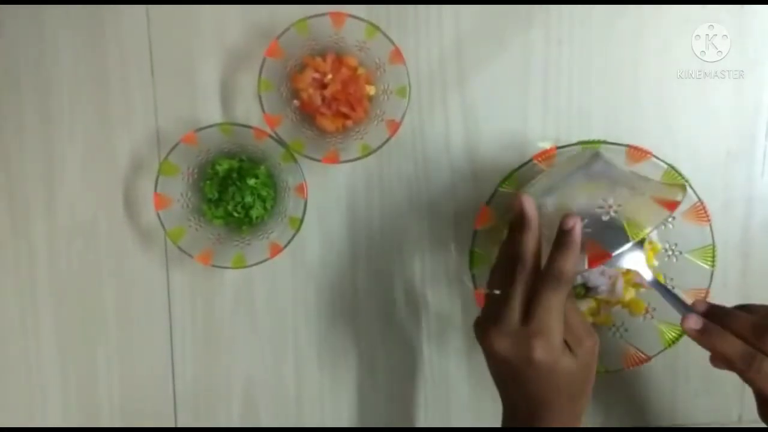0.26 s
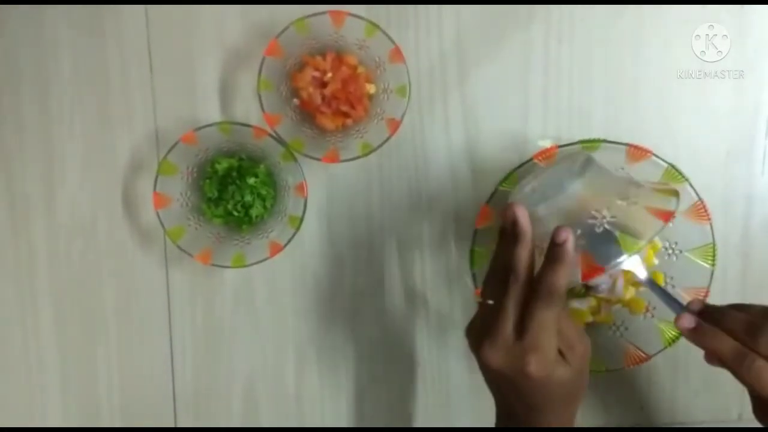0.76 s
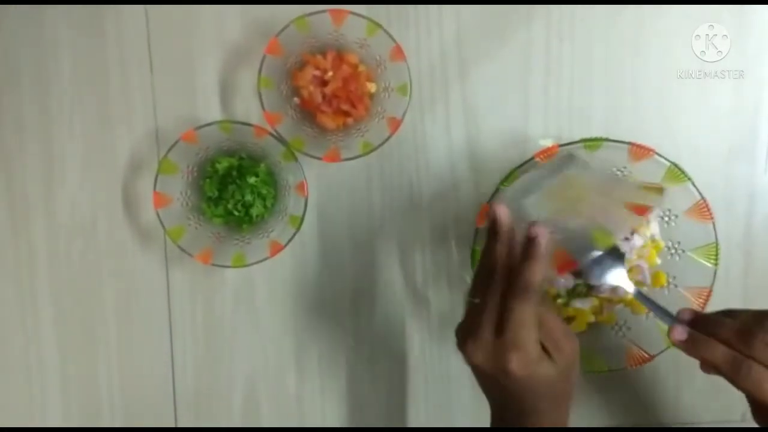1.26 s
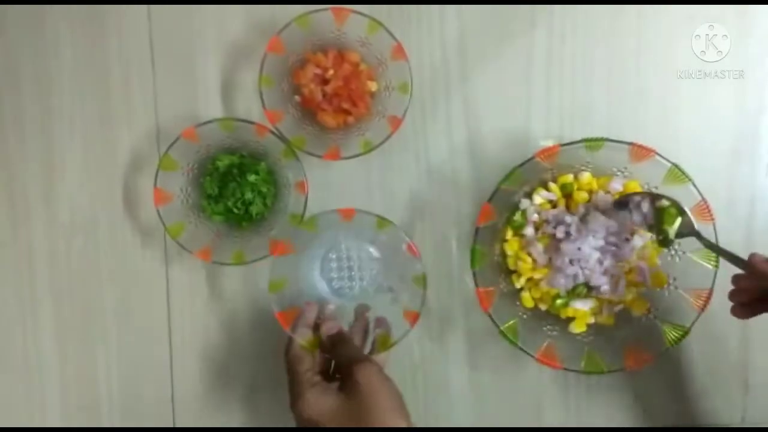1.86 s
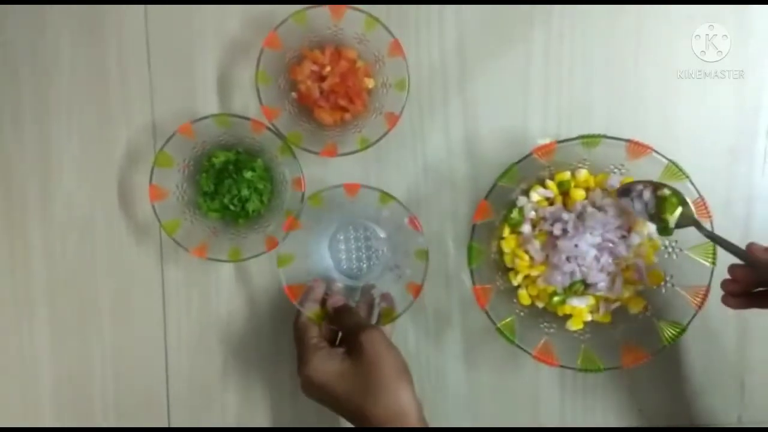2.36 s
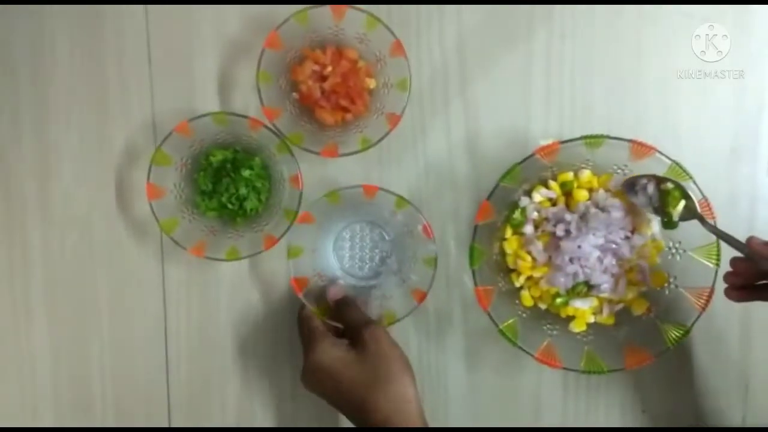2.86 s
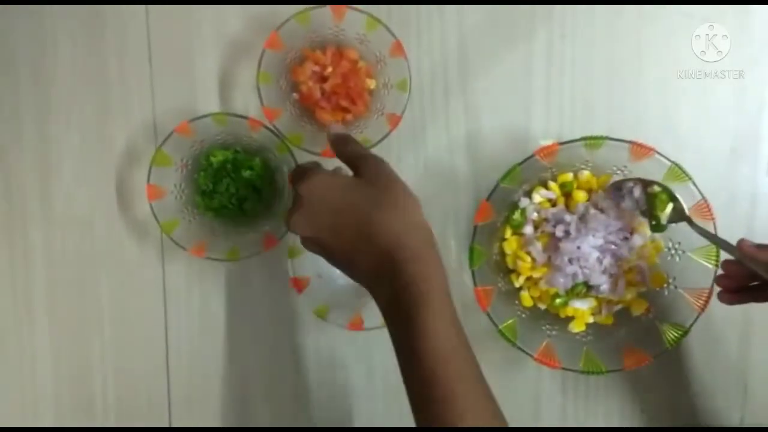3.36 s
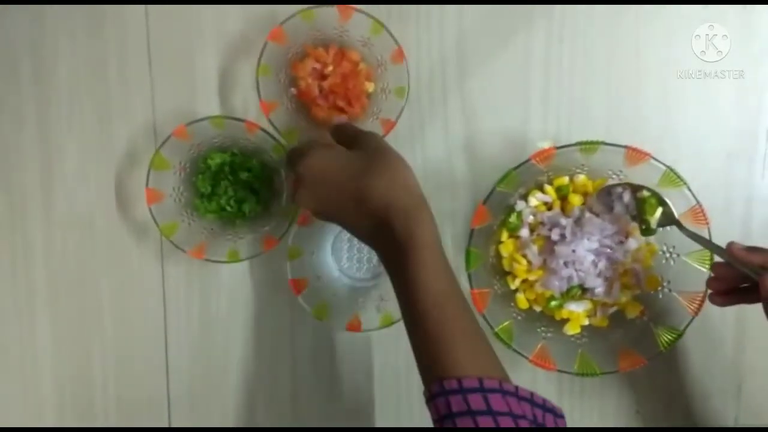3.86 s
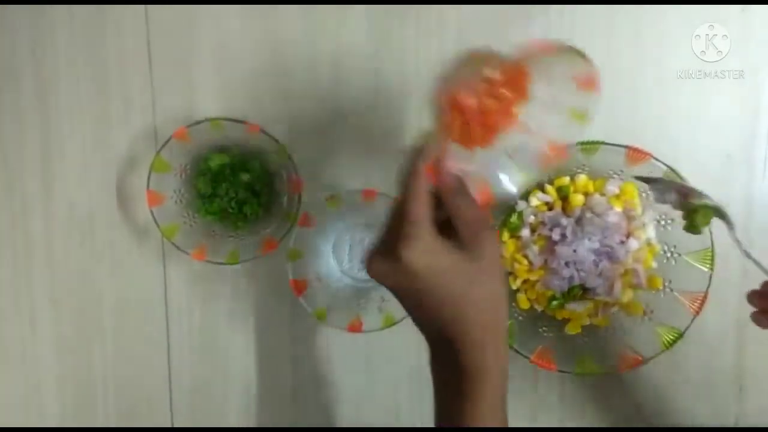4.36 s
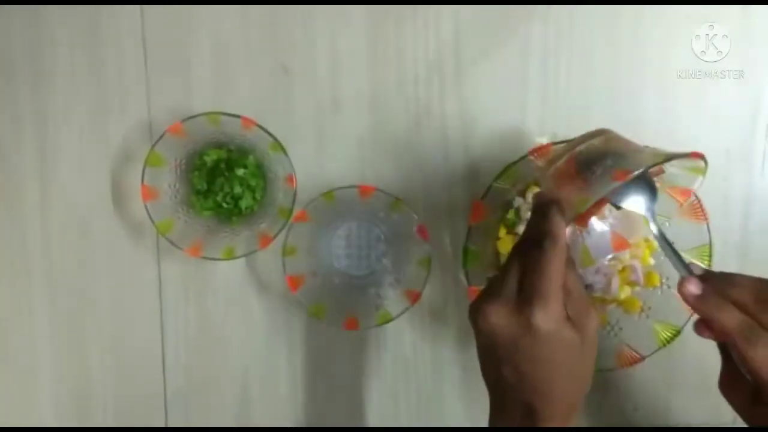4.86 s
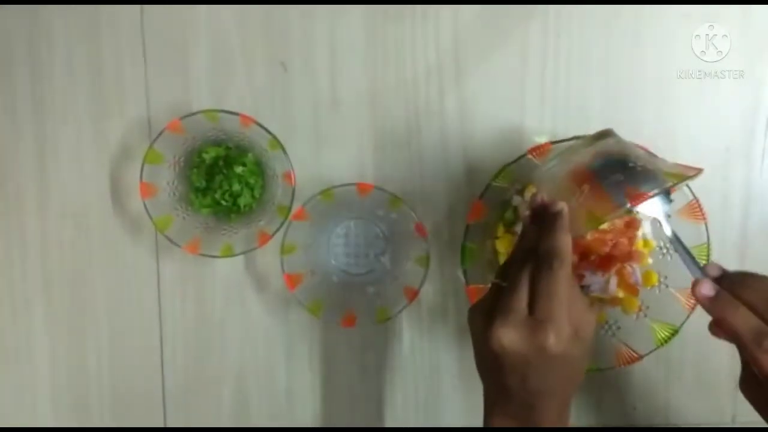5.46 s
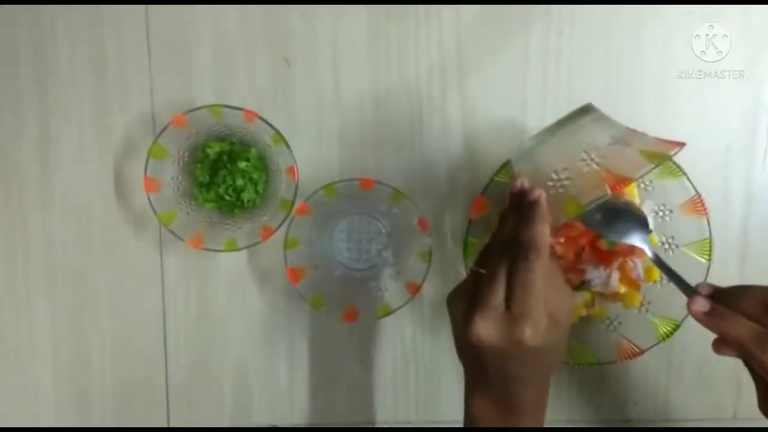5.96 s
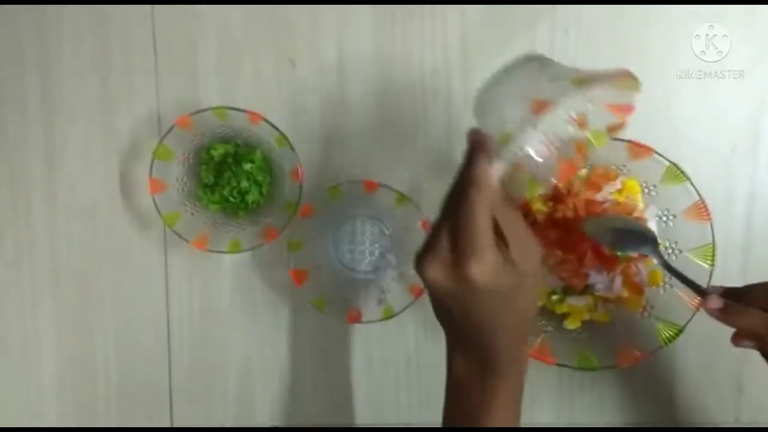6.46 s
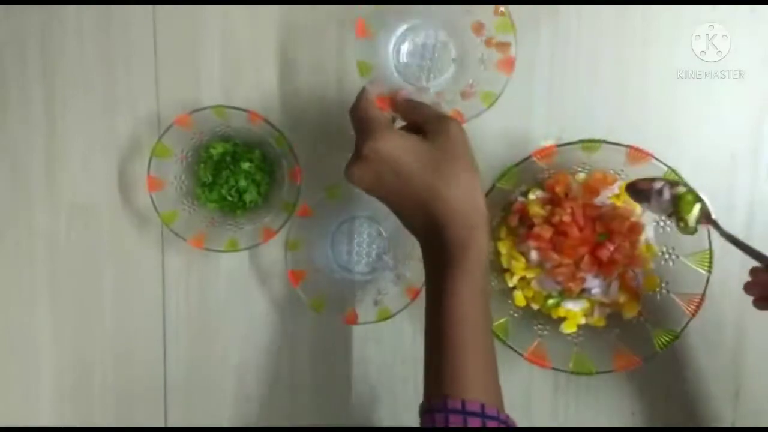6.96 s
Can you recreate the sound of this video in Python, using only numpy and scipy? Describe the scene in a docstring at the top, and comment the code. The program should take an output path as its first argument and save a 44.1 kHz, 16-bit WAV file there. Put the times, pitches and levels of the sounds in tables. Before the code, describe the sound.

In a small, lightly echoing kitchen, a metal spoon scrapes a hand-held glass bowl with irregular sharp clinks, damped by fingers. The empty bowl is set on a wooden table with a hard thud, click and brief rattle, then softly nudged. A second bowl is scraped with a denser run of clinks and tiny ticks. Low room hum and faint hiss persist; close stereo microphone above the table.

```python
"""In a kitchen, a steel spoon scrapes chopped vegetables out of two small hand-held glass bowls. Each clink is
a skidding crack over dying rim and spoon modes; an empty bowl set down on the wooden table and nudged gives
thuds, clicks and rattles; soft low bumps come through the table. The room hums softly, as shaped random spectra
with drifting patches. The two channels carry one sound, one of them inverted and a little late."""
import sys
import numpy as np
from scipy import signal
from scipy.fft import rfft, irfft, next_fast_len
from scipy.io import wavfile
from scipy.ndimage import uniform_filter1d

SR = 44100
rng = np.random.default_rng(int(sys.argv[2]) if len(sys.argv) > 2 else 0)


def log_audio(samples):
    """Write samples as a 16-bit WAV file to the path given in sys.argv[1]."""
    # one column per channel
    frames = np.atleast_2d(samples).T
    # limit to full scale, then quantise
    limited = np.clip(frames, -1, 1)
    pcm = np.round(limited * 32767).astype(np.int16)
    wavfile.write(sys.argv[1], SR, pcm)


N = 318402  # samples


def amp(db):
    """Amplitude factor of a level in dB."""
    return 10 ** (np.asarray(db) / 20)


def evened(x):
    """The signal at an RMS of 1."""
    return x / np.sqrt(np.mean(x ** 2) + 1e-20)


def read(points, hz):
    """Reads a curve of (Hz, value) points, straight over log frequency."""
    point_hz, value = np.transpose(points)
    return np.interp(np.log(hz + 1), np.log(point_hz + 1), value)


def add(mix, start_s, sound):
    """Lays a sound into the mix, cut off at the end."""
    part = mix[..., round(start_s * SR):][..., :sound.shape[-1]]
    part += sound[..., :part.shape[-1]]


def ring(modes, db=0, pitch=1, lasting=1):
    """A struck solid: the sum of its modes, each a dying sine."""
    hz, level_db, t60_s = np.transpose(modes)[:, :, None]
    t = np.arange(SR // 3) / SR
    envelope = amp(level_db + db - 60 * t / abs(t60_s * lasting))
    return (envelope * np.sin(2 * np.pi * hz * pitch * t)).sum(0)


def swing_in(body, rise_s):
    """The modes take a moment to swing."""
    return body * (1 - np.exp(-np.arange(len(body)) / SR / rise_s))


def crack(colour):
    """Minimum-phase impulse: the given colour, starting as promptly as a causal sound can."""
    log_gain = np.log(amp(read(colour, abs(np.fft.fftfreq(1024, 1 / SR)))))
    phase = -signal.hilbert(log_gain).imag
    return np.fft.ifft(np.exp(log_gain + 1j * phase)).real[:512]


def kitchen(x):
    """Room echo: sparse taps of random sign, each band dying at its own speed; other taps per channel."""
    # kitchen decay: hz, t60_s
    decay = [(300, 0.1), (1500, 0.37), (3000, 0.39), (6000, 0.38), (12000, 0.23)]
    taps = np.zeros((2, SR // 2))
    at = np.arange(300, SR // 2 - 20, 20)
    at = at + rng.integers(0, 20, (2, len(at)))
    np.put_along_axis(taps, at, rng.choice([-1., 1.], at.shape), 1)
    hz, t, spectra = signal.stft(taps, SR, nperseg=256)
    dying = amp(-60 * t / abs(read(decay, hz))[:, None])
    tail = signal.istft(spectra * dying, SR, nperseg=256)[1]
    return signal.fftconvolve(x[None], tail / np.linalg.norm(tail[0]), axes=1)


def place(mix, start_s, blow, room_db):
    """Puts a blow, equal in both channels, and its kitchen echo into the mix."""
    add(mix, start_s, np.array([blow, blow]))
    add(mix, start_s, amp(room_db) * kitchen(blow))


def skid(length_s):
    """A brief skid of even colour: every band arrives at a random moment of its own."""
    late = length_s * SR * (.15 + rng.exponential(1 / 5, 65))  # samples, for 65 bands
    # the running sum of the delays over frequency is the phase
    phase = np.cumsum(np.interp(np.arange(1025), np.arange(65) * 16, late)) * np.pi / 1024
    return irfft(np.exp(-1j * phase))[:1024]


def clinks():
    """Spoon on glass: where it lands decides which rim modes sound; the chatter spreads the crack."""
    # spoon blows: start_s, dull_crack_db, bright_crack_db, lowest_rim_mode_db, middle_rim_mode_db,
    # upper_rim_modes_db, spoon_ring_db, chatter_s, ring_length_factor,
    # middle_mode_hz (under the fingers)
    blows = [(.249, 1.5, -10, -19, -17.5, -30.5, -29, 0.01, 0.25, 4790),
             (.503, -10, -5.5, -28.5, -25.5, -22, -19, 0.0065, 0.34, 4910),
             (0.602, -26, -23.5, -56, -62, -65, -59, 0.016, 0.41, 4815),
             (.791, -2, -10.5, -36.5, -19, -24.5, -27, 0.0085, 0.58, 4847),
             (1.212, 0, -13, -28.5, -27, -26, -16, 0.0069, 0.51, 4810),
             (1.378, -5.5, -7, -34.5, -39.5, -51, -38, 0.015, 0.9, 4730),
             (4.771, -13.5, -5, -27, -18.5, -23, -25.5, 0.0081, 0.17, 4770),
             (4.935, -2.5, -1.5, -22, -27.5, -32, -25.5, 0.017, 0.27, 4840),
             (5.125, 0, -17.5, -53, -27, -29.5, -45, 0.012, 0.23, 4760),
             (5.174, -5.5, -11.5, -35, -30, -35, -50, 0.017, 0.37, 4650),
             (5.555, -10.5, -3.5, -41.5, -42, -37, -15, 0.0036, 0.89, 4604),
             (5.611, -33, -23.5, -53, -46, -55, -53, .008, 0.67, 4520),
             (5.629, -27, -31, -58, -43, -57, -48, .012, 0.58, 4550),
             (5.856, -16, -29, -48, -46.5, -50, -39, 0.018, 0.81, 4530),
             (5.895, -18, -30, -41, -55.5, -65, -60, 0.02, 0.83, 4550),
             (5.909, -19, -36.5, -47, -56, -55, -68, 0.0083, 0.37, 4600),
             (6.279, -1.5, -1.5, -23, -11, -23, -28, 0.0079, 0.19, 4678),
             (6.418, -20, -35, -48, -55, -68, -67, .018, 1, 4630)]
    # glass bowls damped by the fingers: hz (below 6000 moved with the middle mode), level_db
    # (before the blow's rim mode level), t60_s (before the ring length factor)
    first_bowl = [(2125, 0, .1), (4815, 0, .12), (6760, -12, .06), (9670, 0, .1), (12935, 0, .06),
                  (14350, -8, .04)]
    second_bowl = [(2110, 0, .1), (4680, 0, .12), (6550, -14, .06), (9950, 0, .06), (13280, 0, .05),
                   (14700, -8, .04)]
    # steel spoon: hz, level_db (before the blow's spoon ring level), t60_s
    spoon = [(8800, -16, .012), (10330, 1, .018), (13550, -9, .02), (14150, -8, .015)]
    # colours of the dull and the bright crack: hz, level_db (before the blow's crack level)
    dull_colour = [(300, -22), (1000, -12.5), (1750, 0), (2100, 3.5), (2800, 2.5), (3500, 0.5), (4800, 8.5),
                   (6000, -6), (9000, -10.5), (16500, -33)]
    bright_colour = [(2000, -13.5), (6000, 1), (8000, -6), (10000, 6), (11800, -5), (13600, 11.5),
                     (15000, -8), (16500, -31.5)]
    swap_s = 4.5  # the second bowl from here on
    ring_room_db, crack_room_db = -10, -10.5
    mix, dull, bright = np.zeros((2, N)), crack(dull_colour), crack(bright_colour)
    for (start_s, dull_db, bright_db, lowest_db, middle_db, upper_db, spoon_db,
         chatter_s, lasting, middle_hz) in blows:
        bowl = first_bowl if start_s < swap_s else second_bowl
        hz = np.transpose(bowl)[0][:, None]
        pitch = np.where(hz < 6000, middle_hz / hz[1], 1)
        weight_db = read([(2100, lowest_db), (4800, middle_db), (9500, upper_db)], hz)
        body = ring(bowl, weight_db, pitch, lasting) + ring(spoon, spoon_db)
        place(mix, start_s, swing_in(body, .0008), ring_room_db)
        colour = amp(dull_db) * dull + amp(bright_db) * bright
        scrape = evened(skid(chatter_s)) / 32  # energy 1
        place(mix, start_s, np.convolve(scrape, colour), crack_room_db)
    return mix


def contact(length_s, clean):
    """A dying chatter of touches after one clean touch; energy 1."""
    u = np.arange(2048) / SR / max(length_s, .0003)
    burst = rng.standard_normal(2048) * np.exp(-3 * u) * (1 - np.exp(-u / .15))
    burst *= np.sqrt(length_s / .004) / np.linalg.norm(burst)
    burst[0] = clean
    return burst / np.linalg.norm(burst)


def knocks():
    """Bowls on table or each other: the top thuds, the hard foot clicks, the bowl sings on."""
    # dull knocks: start_s, blow_db, main_mode_hz, sharpness_db, rattle_s, bowl_ring_db
    blows = [(2.482, -8.5, 1300, -22.5, 0.004, -8.5), (2.497, -2.5, 1320, -27, 0.041, -20),
             (2.595, -12.5, 1200, -29.5, 0.054, -37), (2.618, -25, 1160, -50, 0.043, -30),
             (2.666, 1.5, 1570, -31, 0.0011, -53), (2.801, -32, 1490, -19, 0.0048, -25.5),
             (3.371, -22, 1430, -28.5, 0.028, -26), (3.588, -20.5, 1200, -50, 0.0046, -21.5),
             (3.687, -16.5, 1310, -63, 0.0047, -37), (3.965, -28.5, 1320, -50, 0.016, -46),
             (4.015, -28.5, 1260, -51, 0.03, -39), (4.061, -30, 1330, -40, 0.011, -46),
             (4.935, -18.5, 1120, -52, 0.0064, -50), (5.126, -14.5, 2780, -40, 0.0017, -62),
             (5.851, -28, 580, -50, 0.13, -69)]
    # table top: multiple_of_main_mode, level_db, t60_s
    table_top = [(0.641, -11.5, 0.0043), (.82, -6, 0.009), (1, 5, 0.008), (1.26, -8, 0.012), (1.7, 2, .006),
                 (1.95, 5, 0.006)]
    # bowl standing free: hz, level_db (before the bowl ring level), t60_s
    free_bowl = [(2166, -3, .33), (4800, -11, .04), (6780, -24, .05), (10322, -15, .03), (11300, -22, .03),
                 (12830, -19, .03), (13620, -8, .03)]
    # lingering modes that only sharp knocks wake: hz, level_db (before the sharpness), t60_s
    sharp_ring = [(1648, 8, .06), (13780, -5, .04)]
    # click of the hard foot: hz, level_db (before the sharpness)
    foot_colour = [(500, 10.5), (1500, 3), (2600, 40), (3300, 21.5), (4200, 27.5), (6000, 21), (10000, 15),
                   (13700, 20.5), (16500, -4)]
    touch_s = .0033  # rattles shorter than this are mostly one clean touch
    room_db = -9
    mix, click = np.zeros((2, N)), crack(foot_colour)
    upper = np.transpose(table_top)[0][:, None] > 1.5
    for start_s, blow_db, main_hz, sharp_db, rattle_s, bowl_db in blows:
        # soft blows miss the upper modes
        body = ring(table_top, upper * (sharp_db + 20.5), main_hz)
        body += ring(free_bowl, bowl_db) + ring(sharp_ring, sharp_db)
        body = swing_in(body, .0006)
        body[:512] += amp(sharp_db) * click
        touches = contact(rattle_s, touch_s / rattle_s)
        place(mix, start_s, amp(blow_db) * signal.fftconvolve(touches, body), room_db)
    # the knocks keep little bass
    return signal.sosfilt(signal.butter(2, 500., "high", fs=SR, output="sos"), mix)


def scatter(sound):
    """Short random echoes differing in each channel: a few milliseconds of dying echoes, upper pitches only."""
    level_db, decay_s, lowest_hz = -4.5, .0015, 1780
    paths = rng.standard_normal((2, 512)) * np.exp(-np.arange(512) / SR / decay_s)
    paths /= np.linalg.norm(paths[0])
    upper = signal.sosfilt(signal.butter(2, lowest_hz, "high", fs=SR, output="sos"), sound)
    return amp(level_db) * signal.oaconvolve(upper, paths, axes=1)[:, :N]


def bumps():
    """Soft bumps through the table: a couple of low cycles under a smooth hump."""
    # bumps: centre_s, level_db
    soft_bumps = [(0.123, -35), (1.65, -41.5), (3.523, -36.5), (5.1, -39), (5.137, -37.5), (5.501, -37.5),
                  (7.102, -39)]
    bump_hz, bump_s = 96.5, .0067
    mix, t = np.zeros(N), np.arange(-1024, 1024) / SR
    hump = np.sin(2 * np.pi * bump_hz * t) * np.exp(-(t / bump_s) ** 2)
    for centre_s, level_db in soft_bumps:
        add(mix, centre_s - 1024 / SR, amp(level_db) * hump)
    return mix


def hum():
    """Room hum and hiss: random short-time spectra with drifting patches, unrelated in two channels."""
    # colour with humps near 350 Hz and 1 kHz: hz, relative_density_db
    colour = [(20, -45), (60, 3), (120, -5.5), (210, -9.5), (340, 2.5), (520, -9), (800, -8.5),
              (1000, -5.5), (1400, -15.5), (2200, -19.5), (4000, -29), (8000, -38.5), (15300, -31.5),
              (15800, -54)]
    # background level, sinking after loud blows and creeping back: time_s, level_db (before the gain)
    level_curve = [(0.0, -56.5), (.25, -53), (.28, -60.5), (0.49, -53.5), (.53, -64.5), (1.492, -62.5),
                   (2.471, -52), (2.66, -51.5), (2.7, -61.5), (3.7, -51), (4.75, -52.5), (4.8, -59),
                   (5.53, -52), (5.58, -61), (5.95, -56), (6.261, -55), (6.31, -63), (7.22, -54.5)]
    # above the quiet level the hiss rises by only this share of the hum's rise
    quiet_db, hiss_share = -56, .8  # quiet level before the gain
    gain_db = 6.5
    frames, hz = N // 256 + 5, np.fft.rfftfreq(1024, 1 / SR)
    a, b, c, d, patches = rng.standard_normal((frames, 513, 5)).T
    patches = evened(uniform_filter1d(uniform_filter1d(patches, 10, 0), 10, 1))
    hum_db = np.interp(np.arange(frames) * 256 / SR, *np.transpose(level_curve))
    treble = np.clip(np.log2((hz + 1) / 990.0), 0, 1)[:, None]  # 0 for hum, 1 for hiss
    held_back_db = treble * (1 - hiss_share) * (hum_db - quiet_db)
    level = amp(hum_db - held_back_db + (2.0 - .3 * treble) * patches)
    shape = amp(read(colour, hz))[:, None]
    spectra = np.array([a + 1j * b, c + 1j * d]) * level * shape / np.linalg.norm(shape)
    return amp(gain_db) * signal.istft(spectra, nperseg=1024, noverlap=768)[1][:, :N]


def comb_channels(sound, lean):
    """The late, inverted channel combs sum (row 0) and difference (row 1) in turn."""
    # turn between the channels below the first comb notch: hz, turn_rad
    low_turn = [(20, 3.54), (130, 2.205), (260, 0.73), (500, 0.64), (1100, 0.26), (1500, 0.59),
                (1800, 2.11)]
    lag = 20  # samples between the channels
    size = next_fast_len(N)
    hz, notch_hz = np.fft.rfftfreq(size, 1 / SR), SR / lag
    below = read([*low_turn, (notch_hz, np.pi)], hz)
    turn = np.where(hz < notch_hz, below, np.pi * (2 * hz / notch_hz - 1))
    total, apart = rfft(sound, size)
    total, apart = total * np.cos(turn / 2), -1j * apart * np.sin(turn / 2)
    tilt = amp(read(lean, hz) / 2)  # half the lean on each side
    return irfft(np.array([(total + apart) * tilt, (total - apart) / tilt]), size)[:, :N]


def scene():
    """Nearby blows and the background as the two channels carry them."""
    # left over right, for the blows and for the background: hz, lean_db
    blow_lean = [(500, -0.5), (1500, 2), (5000, -1.5), (12000, -4)]
    hum_lean = [(60, 1), (300, 1.5), (2000, 0.5)]
    blows = clinks() + knocks()
    near = comb_channels(blows, blow_lean) + scatter(blows)
    background = bumps() + hum()
    return near + comb_channels(background, hum_lean)


def record(dry):
    """Peaks are clipped at a ceiling; then a steep low-pass sets the band limit."""
    ceiling, edge_hz = .97, 16550
    low_pass = signal.firwin(511, edge_hz, window=("kaiser", 9), fs=SR)
    return signal.oaconvolve(np.clip(dry, -ceiling, ceiling), low_pass[None], "same")


dry = scene()
out = record(dry)
log_audio(out)
```